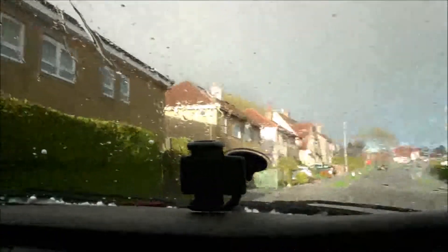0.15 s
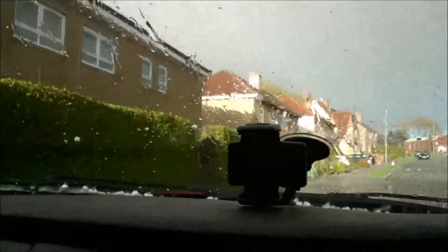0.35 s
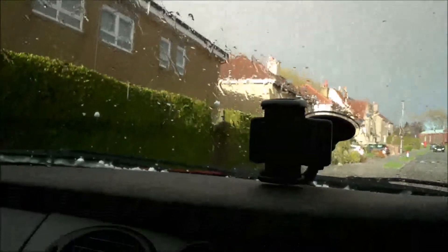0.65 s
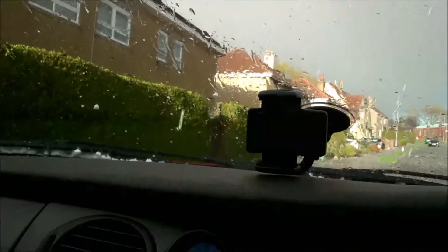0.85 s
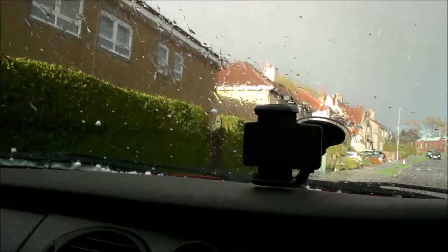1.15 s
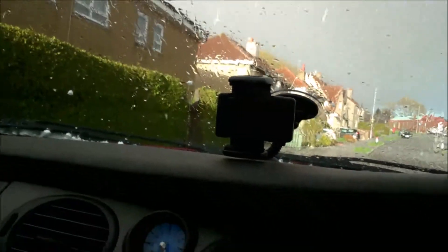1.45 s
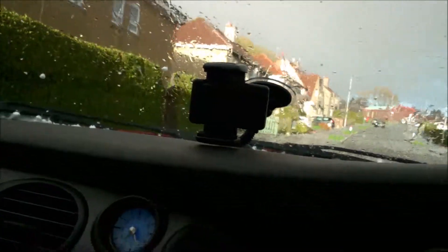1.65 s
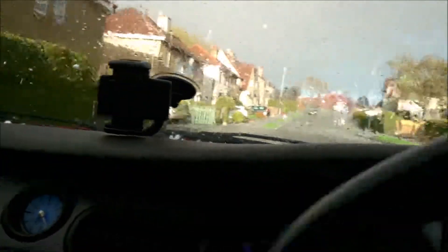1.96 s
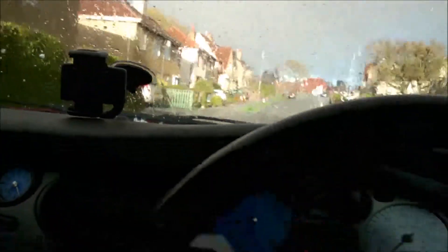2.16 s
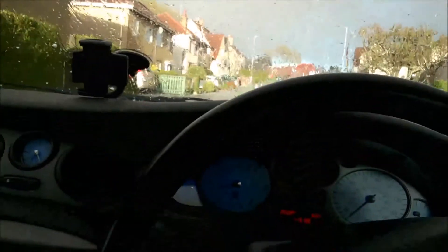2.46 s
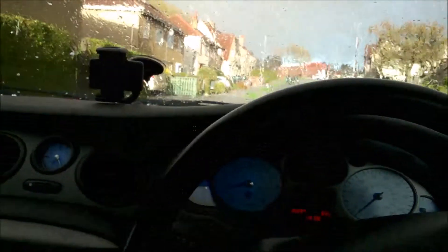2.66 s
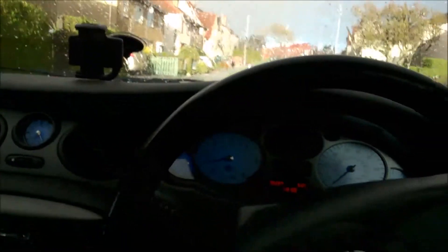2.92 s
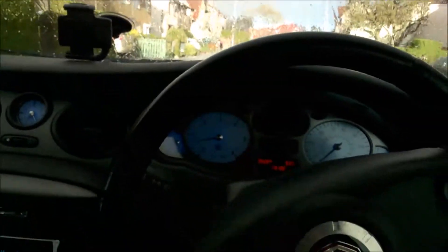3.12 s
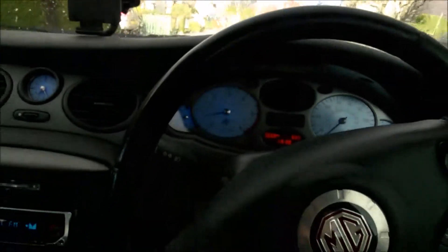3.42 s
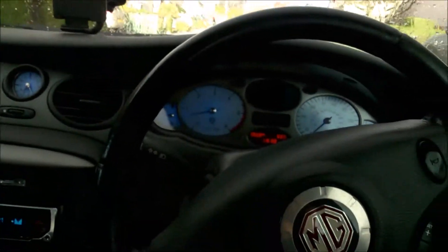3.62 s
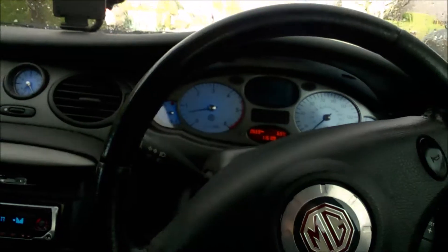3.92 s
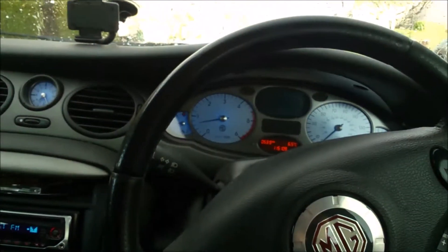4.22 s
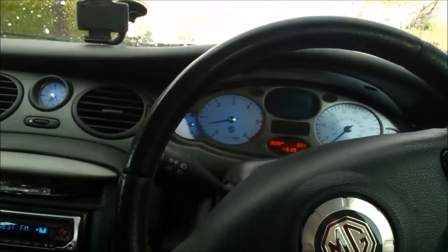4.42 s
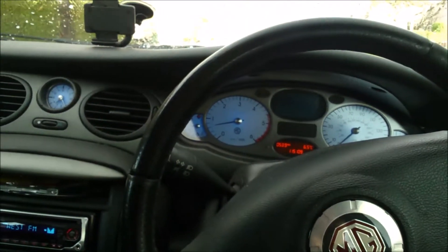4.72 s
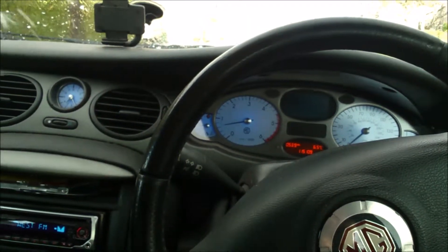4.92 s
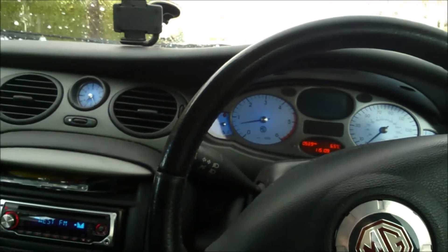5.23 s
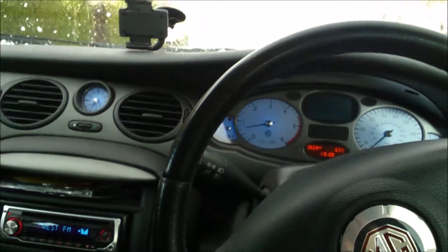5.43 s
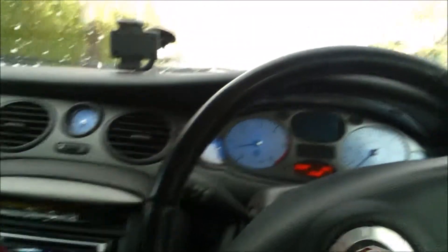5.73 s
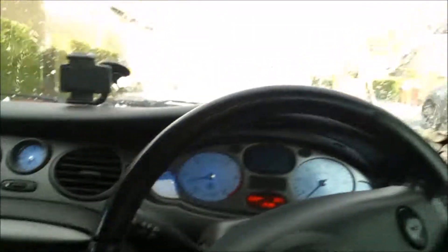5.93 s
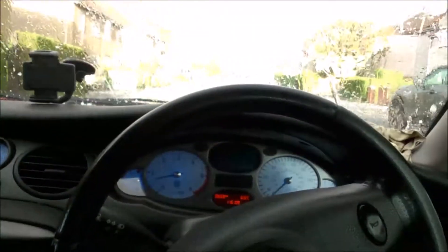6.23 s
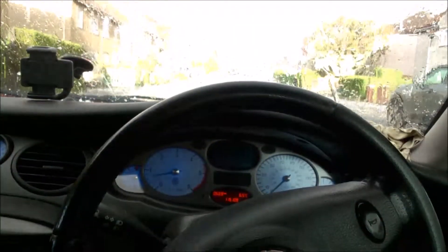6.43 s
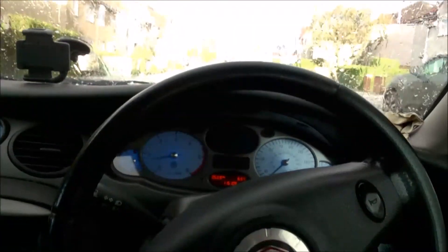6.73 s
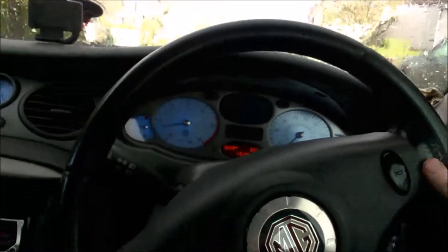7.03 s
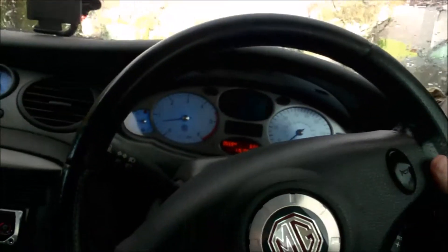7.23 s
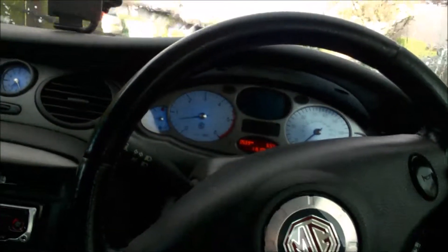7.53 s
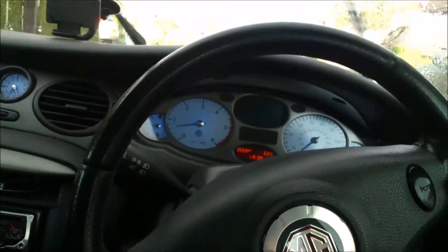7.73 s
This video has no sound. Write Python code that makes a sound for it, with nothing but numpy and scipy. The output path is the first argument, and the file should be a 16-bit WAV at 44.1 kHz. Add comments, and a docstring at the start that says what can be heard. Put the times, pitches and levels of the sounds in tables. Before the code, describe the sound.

Hailstones crack on a windscreen and thud on a car roof, thickening steadily, heard from the driver's seat over a low idling engine hum.

```python
"""Hail on a parked car

Heard from the driver's seat: stones crack on the glass and thud on the roof, and panels and cabin ring briefly.
Close by, decaying sines give clicks, knocks and booms, and bands of fading noise give the ring of the shell.
Farther off, small stones merge into a shaped hiss; the idling engine hums as sines over a low noise rumble.
Two unlike microphones listen: the left one is thin in the bass and dull in the treble.
"""
import sys
import numpy as np
from scipy import signal
from scipy.fft import rfft, irfft, next_fast_len
from scipy.io import wavfile
from scipy.ndimage import map_coordinates

SR = 44100
rng = np.random.default_rng(int(sys.argv[2]) if len(sys.argv) > 2 else 0)


def ratio_of_db(decibels):
    """Turn decibels (scalar or array-like) into linear amplitude factors; 0 dB maps to 1."""
    return 10 ** (np.asarray(decibels, float) / 20)


def master_out(mix):
    """Clip the mix to full scale and print it as 16-bit PCM to the path in sys.argv[1]."""
    frames = np.transpose(np.atleast_2d(mix))
    ceiling = np.clip(frames, -1, 1)
    pcm = np.round(ceiling * 32767).astype(np.int16)
    wavfile.write(sys.argv[1], SR, pcm)


N = 347067  # length in samples


def along(points, hz):
    """Reads (hz, value) points on a log frequency axis."""
    point_hz, value = np.transpose(points)
    return np.interp(np.log(hz + 1), np.log(point_hz + 1), value)


def curves(rows):
    """One value per sample for each column after the time."""
    start_s, *columns = np.transpose(rows)
    return [np.interp(np.arange(N) / SR, start_s, column) for column in columns]


def unit(x):
    """Scaled to rms 1."""
    return x / np.sqrt(np.mean(x ** 2) + 1e-20)


def wobble(rate):
    """A smooth random curve, rate knots a second."""
    knots = rng.standard_normal(int(N * rate / SR) + 4)
    return map_coordinates(knots, [np.arange(N) * rate / SR])


def filtered(x, response):
    """x times a complex response of frequency."""
    size = next_fast_len(N + 8192)
    spectrum = rfft(x, size) * response(np.fft.rfftfreq(size, 1 / SR))
    return irfft(spectrum, size)[..., :N]


# Likeness of diffuse sound at the two microphones: pitch_hz [Hz], likeness [0 to 1]
LIKENESS = [(300, 0.92), (640, 0.81), (1400, 0.12), (3000, 0.0062)]


def diffuse():
    """White noise at both microphones, alike in the bass and unrelated in the treble."""
    def mid_and_side(hz):
        angle = np.arccos(np.clip(along(LIKENESS, hz), 0, 1)) / 2
        return np.array([np.cos(angle), np.sin(angle)])
    mid, side = filtered(rng.standard_normal((2, N)), mid_and_side)
    return np.array([mid + side, mid - side])


# Engine firing, before a common lift: start_s [s], pitch_hz [Hz], level_db [dB]
FIRING = [(0, 51.6, -29), (1.2, 52.24, -29.5), (7.87, 51.73, -30.5)]
# Engine orders at 1/2, 3/2 and 2 times the firing rate: level_db [dB beside the firing tone]
ORDER_LEVELS = [-24, -13.5, -16.5]
# Steady low tone that comes in later, before a small lift: start_s [s], level_db [dB]
DRONE_LEVEL = [(3.5, -58), (4.5, -36), (7.87, -36.5)]
# Colour of the body rumble: pitch_hz [Hz], level_db [dB per Hz, relative]
RUMBLE_COLOUR = [(30, -26), (65, -0.5), (120, 8), (300, -8), (2500, -28)]


def engine():
    """The idling engine: a strong firing tone, weaker orders, a low drone and a noisy body rumble."""
    firing_hz, firing_db = curves(FIRING)
    phase = 2 * np.pi * np.cumsum(firing_hz) / SR
    hum = ratio_of_db(0.4 * wobble(6)) * np.sin(phase)
    for order, order_db in zip((0.5, 1.5, 2), ORDER_LEVELS):
        hum += ratio_of_db(order_db + 2.2 * wobble(5)) * np.sin(order * phase + 6 * rng.random())
    drone_hz = 86.6
    drone_db = curves(DRONE_LEVEL)[0] + 1.9 * wobble(2.8)
    drone = ratio_of_db(drone_db) * np.sin(2 * np.pi * drone_hz * np.arange(N) / SR)
    rumble = unit(filtered(diffuse(), lambda hz: ratio_of_db(along(RUMBLE_COLOUR, hz))))
    rumble_db = -41.0 + 0.43 * wobble(13.0)
    return ratio_of_db(firing_db + 7) * hum + ratio_of_db(0.5) * drone + ratio_of_db(rumble_db) * rumble


# Hiss of far stones: start_s [s], level_db [dB]
PATTER_LEVEL = [(0, -48.5), (2.5, -49.5), (7.87, -47.5)]
# Colour of that hiss: pitch_hz [Hz], level_db [dB per Hz, relative]
PATTER_COLOUR = [(600, -21), (1200, 4), (4500, -3), (8000, 0.5), (12000, -4.5), (16000, -16)]


def patter():
    """Small stones far along the body and on the street merge into a shaped noise hiss."""
    (level_db,) = curves(PATTER_LEVEL)
    hiss = unit(filtered(diffuse(), lambda hz: ratio_of_db(along(PATTER_COLOUR, hz))))
    return ratio_of_db(level_db + 0.75 * wobble(30)) * hiss


# Stones on the lined roof, a dull knock first, levels relative:
# start_s [s], knock_db [dB], shatter_db [dB], pitch_hz of the spot struck [Hz]
ROOF_STONES = [(0.084, -27, -32.5, 465), (0.145, -36.5, -41, 791), (0.301, -32, -39, 950),
               (0.389, -37.5, -44.5, 1070), (0.662, -33, -29, 1180), (0.718, -21.5, -25, 1100),
               (0.927, -28, -27.5, 1100), (1.048, -20, -22, 649), (1.152, -28.5, -39, 1100),
               (1.236, -36.5, -44, 829), (1.442, -28.5, -37.5, 634), (1.721, -22.5, -34, 1060),
               (1.855, -30, -29.5, 1180), (2.048, -38, -59, 619), (2.105, -23, -33, 517),
               (2.196, -18.5, -27.5, 455), (2.296, -33, -33, 576), (2.521, -25.5, -23, 579),
               (2.664, -31, -35, 504), (2.934, -22.5, -17.5, 463), (2.976, -21, -11.5, 1220),
               (2.987, -19.5, -37, 579), (3.033, -21.5, -22, 444), (3.072, -30.5, -33, 422),
               (3.169, -22.5, -26.5, 735), (3.224, -33, -36, 554), (3.481, -20, -22.5, 510),
               (3.548, -21, -23.5, 1040), (3.634, -18.5, -23, 512), (3.806, -18.5, -14.5, 1245),
               (3.979, -32.5, -36, 648), (4.065, -30.5, -34, 455), (4.259, -26, -19.5, 1260),
               (4.315, -24, -27, 525), (4.337, -24, -22, 1040), (4.383, -27, -54, 961),
               (4.469, -17.5, -23.5, 765), (4.615, -25.5, -31, 640), (4.665, -23, -18, 1013),
               (4.678, -17.5, -7.5, 990), (4.87, -26.5, -25.5, 649), (5.248, -40, -35, 600),
               (5.306, -17.5, -25, 474), (5.479, -22.5, -19.5, 533), (5.542, -31, -30.5, 484),
               (5.653, -29, -27, 1043), (5.814, -22.5, -21, 740), (5.879, -26.5, -27, 514),
               (6.088, -28.5, -31, 650), (6.107, -25.5, -27.5, 724), (6.331, -25.5, -31, 603),
               (6.447, -23, -27.5, 536), (6.514, -23.5, -19.5, 533), (6.899, -23.5, -29, 443),
               (6.931, -20.5, -9.5, 439), (7, -38, -23, 650), (7.056, -31, -38, 495),
               (7.192, -24.5, -24.5, 654), (7.389, -20.5, -13, 620), (7.421, -26.5, -24, 605),
               (7.578, -22.5, -21, 490), (7.594, -21, -14.5, 1020), (7.651, -24, -18.5, 427),
               (7.711, -23, -22.5, 474)]
# Stones on the glass, a hard tick first, levels relative: start_s [s], tick_db [dB], shatter_db [dB]
GLASS_STONES = [(0.275, -36, -39), (0.451, -29.5, -32), (1.005, -32.5, -39), (1.109, -18, -33.5),
                (1.183, -27, -39.5), (1.256, -33, -35), (1.307, -32, -41.5), (1.523, -41.5, -48),
                (1.569, -16.5, -17.5), (1.938, -26, -42), (2.272, -39, -45), (2.643, -42, -46),
                (2.864, -26, -32.5), (3.15, -35, -36), (3.295, -40, -40), (3.464, -23, -25.5),
                (3.693, -25, -35.5), (3.791, -34, -18.5), (3.87, -31, -21), (3.884, -23.5, -30),
                (3.93, -37.5, -39), (3.965, -31.5, -50), (4.017, -18.5, -15.5), (4.108, -24, -33.5),
                (4.163, -27.5, -32), (4.192, -34.5, -46), (4.226, -19.5, -26.5), (4.456, -31.5, -40),
                (4.56, -31, -33), (4.583, -26.5, -30), (4.631, -21.5, -23), (4.744, -31.5, -30.5),
                (4.799, -32.5, -47), (4.822, -25.5, -21), (4.896, -34, -26), (4.94, -30.5, -26),
                (5.011, -27, -33), (5.049, -22.5, -30.5), (5.105, -35, -48), (5.161, -40, -36),
                (5.19, -31, -31.5), (5.264, -26.5, -74), (5.376, -27.5, -37), (5.408, -28.5, -46),
                (5.449, -29.5, -22), (5.514, -25.5, -27), (5.628, -35.5, -30.5), (5.67, -20, -20),
                (5.722, -29.5, -22), (5.77, -36, -36), (5.863, -33.5, -33), (5.899, -18.5, -17),
                (5.942, -23, -22.5), (6.045, -26, -32.5), (6.076, -29, -29.5), (6.147, -44, -26.5),
                (6.222, -24.5, -46), (6.238, -24.5, -27.5), (6.348, -22.5, -26.5), (6.365, -19.5, -15),
                (6.392, -23, -28), (6.484, -20, -20), (6.533, -24.5, -25), (6.599, -25, -28),
                (6.641, -32, -51), (6.664, -23, -26.5), (6.699, -29, -45), (6.739, -29, -24.5),
                (6.763, -22.5, -28), (6.847, -24.5, -11.5), (6.871, -35, -21.5), (7.004, -20.5, -19),
                (7.145, -36, -39), (7.214, -22.5, -15), (7.327, -25.5, -40), (7.346, -29, -24),
                (7.48, -31, -26.5), (7.504, -26, -27.5), (7.535, -27.5, -51), (7.643, -27, -22.5),
                (7.809, -27.5, -16.5)]


def big_stones():
    """Rows (start_s, knock_db, tick_db, shatter_db): where a stone lands sets knock against tick."""
    roof_tick_db, glass_knock_db = -1.5, -11.5  # beside the roof knock; beside the glass tick
    roof = [(s, knock_db, knock_db + roof_tick_db, shatter_db) for s, knock_db, shatter_db, _ in ROOF_STONES]
    glass = [(s, tick_db + glass_knock_db, tick_db, shatter_db) for s, tick_db, shatter_db in GLASS_STONES]
    return np.array(roof + glass)


def shower(typical_db, uneven_db, grows_db):
    """All near stones: the big ones, and 120 small ones that fall at random."""
    draws = rng.standard_normal((120, 4))
    late = np.sqrt(rng.random((len(draws), 1)))  # the shower thickens steadily and its stones grow
    spread_db = uneven_db * (draws[:, :1] + draws[:, 1:])  # one draw for the stone, one for each level
    small_db = typical_db + spread_db + grows_db * (late - 1)
    return np.vstack([big_stones(), np.hstack([late * N / SR, small_db])])


def glassy(stones):
    """Near 0 for a dull knock on the lined roof or a slushy splash, near 1 for a hard tick on the glass."""
    _, knock_db, tick_db, shatter_db = np.transpose(stones)
    dull_db = np.maximum(knock_db + 4, shatter_db)
    return 1 / (1 + np.exp((dull_db - tick_db) / 1.25))


def struck(blows, modes_hz, t60, db, uneven_db, detune, off_pitch_db, apart_ms):
    """Each (start_s, level_db, pitch_hz) blow rings clear modes, weaker by off_pitch_db an octave away
    from its pitch; every mode reaches the two microphones a little apart."""
    out = np.zeros((2, N + SR))
    t = np.arange(SR // 4) / SR
    hz = np.array(modes_hz)[:, None]
    fade = ratio_of_db(-60 * t / t60) * (1 - np.exp(-t * hz))  # each mode builds over about a cycle
    draws = rng.standard_normal((len(blows), 3, len(hz), 1))
    for (start_s, blow_db, pitch_hz), (uneven, shift, delay) in zip(blows, draws):
        octaves_off = np.abs(np.log2(hz / pitch_hz))
        mode_db = blow_db + db + uneven_db * uneven - off_pitch_db * octaves_off
        heard_s = t + np.multiply.outer([-0.5, 0.5], apart_ms / 1000 * delay)
        modes = ratio_of_db(mode_db) * fade * np.sin(2 * np.pi * hz * (1 + detune * shift) * heard_s)
        out[:, round(start_s * SR):][:, :len(t)] += modes.sum(axis=1)
    return out[:, :N]


# Lowest modes of the roof: pitch_hz [Hz]
ROOF_MODES = [134, 154, 181.1, 265.5, 296.4]
# Heavy blows in the middle of the roof, levels relative: start_s [s], level_db [dB]
HEAVY_BLOWS = [(0.094, -25), (0.72, -23), (1.106, -21.5), (1.44, -39), (1.935, -39), (3.489, -14),
               (4.226, -27), (4.314, -22.5), (4.466, -20), (4.677, -16), (5.815, -23), (6.929, -16),
               (7.206, -23), (7.577, -18.5)]


def roof_booms():
    """Heavy blows set the lowest modes of the roof ringing, strongest near the pitch of its middle."""
    middle_hz = 154
    blows = [(*blow, middle_hz) for blow in HEAVY_BLOWS]
    return struck(blows, ROOF_MODES, t60=0.38, db=-7, uneven_db=4, detune=0.0138, off_pitch_db=3, apart_ms=0.17)


# Clear modes of roof and screen: pitch_hz [Hz]
PANEL_MODES = [459, 520.3, 643, 916, 1074, 1226, 1388, 1678]


def panel_knocks():
    """Roof stones ring the panel modes, strongest near the pitch of the spot struck."""
    blows = np.delete(ROOF_STONES, 2, axis=1)  # without the shatter level
    return struck(blows, PANEL_MODES, t60=0.09, db=4.5, uneven_db=2.0, detune=0.015, off_pitch_db=28,
                  apart_ms=0.17)


# Bands of the struck shell: pitch_hz [Hz], level_db [dB, relative],
# place [0 follows the knock, 1 the tick, 2 the shatter], t60_s of the early decay [s]
SHELL_BANDS = [(180, -17.5, 0.59, 0.39), (340, -15, 0.4, 0.35), (574, -6.5, 0, 0.15),
               (956, -4.5, 0.093, 0.14), (1790, -4.5, 0.53, .1), (2410, -2.5, 0.87, 0.083),
               (3960, -3, 1.27, 0.076), (5760, -3, 1.37, 0.071), (8050, 3.5, 2, 0.054),
               (11770, -6.5, 2, 0.049), (13200, -8, 2, 0.055)]


def ringing(stones, colour_db, roof_ms, glass_ms, late_db, late_times):
    """Each stone sets the dense modes of the shell going; every noise band dies at its own speed."""
    hz, level_db, place, t60_s = np.transpose(SHELL_BANDS)[:, :, None]
    step_s = 8 / SR
    t = np.arange(0, 0.3, step_s)
    power = np.zeros((len(SHELL_BANDS), round(N / SR / step_s) + len(t) + 2))
    spots = rng.standard_normal((len(stones), len(SHELL_BANDS), 1))  # every spot struck has its own colour
    early = ratio_of_db(-120 * t / t60_s)  # decays are of power, so their dB count double
    late = ratio_of_db(2 * late_db - 120 * t / (t60_s * late_times))
    for (start_s, *levels_db), glass, spot in zip(stones, glassy(stones), spots):
        start = round(start_s / step_s)
        rise_ms = roof_ms + glass * (glass_ms - roof_ms)  # the roof fills the cabin slowly, glass snaps at once
        build = 1 - np.exp(-1000 * t / rise_ms)
        gain = ratio_of_db(np.interp(place, range(3), levels_db) + level_db + colour_db * spot)
        power[:, start:start + len(t)] += gain ** 2 * build * (early + late)
    noise = diffuse()
    edges = [4.6, *np.log(hz[:, 0]), 9.8]  # log Hz
    steps = np.arange(N) / SR / step_s
    ring = np.zeros((2, N))
    for k in range(len(SHELL_BANDS)):
        peak = np.arange(len(edges)) == k + 1  # a triangle between the neighbouring bands
        band = filtered(noise, lambda f: np.interp(np.log(f + 1), edges, peak))
        loudness = np.interp(steps, range(power.shape[1]), np.sqrt(power[k]))
        ring += loudness * unit(band)
    return ring


def clicks(stones, db, centre_hz, life_ms):
    """Hard ice on glass: a few cycles of two random tones that reach the microphones directly."""
    out = np.zeros(N + SR)
    t = np.arange(SR // 100) / SR
    envelope = t / t[20] * np.exp(-1000 * t / life_ms)
    draws = rng.standard_normal((len(stones), 2, 1))
    for (start_s, _, tick_db, _), glass, draw in zip(stones, glassy(stones), draws):
        cycles = np.sin(2 * np.pi * centre_hz * np.exp(0.29 * draw) * t).sum(axis=0)
        out[round(start_s * SR):][:len(t)] += glass * ratio_of_db(tick_db + db) * cycles * envelope
    return out[:N]


def hail():
    """The near stones: clicks, knocks, booms and a ring that crackles with splinters of ice."""
    stones = shower(typical_db=[-44, -44, -44], uneven_db=3.5, grows_db=9.5)
    ring = ringing(stones, colour_db=2.5, roof_ms=7.13, glass_ms=0.4, late_db=-18.5, late_times=2.2)
    splinters = unit(ratio_of_db(1.2 * wobble(1500)))
    ticks = clicks(stones, db=15, centre_hz=3790, life_ms=0.49)
    return ratio_of_db(6) * splinters * ring + panel_knocks() + roof_booms() + ticks


def scene():
    """The engine, the far patter and the near hail."""
    return engine() + patter() + hail()


# Treble shading of the left microphone: pitch_hz [Hz], level_db [dB]
LEFT_SHADING = [(3000, -0.67), (5000, -2), (8000, -11), (15000, -17)]


def left_microphone(x):
    """Loses bass like a simple high-pass and is shaded in the treble."""
    bass_hz = 99
    return filtered(x, lambda hz: ratio_of_db(along(LEFT_SHADING, hz)) * 1j * hz / (bass_hz + 1j * hz))


def top_cut(x):
    """Nothing passes above the cut-off."""
    return signal.sosfilt(signal.butter(12, 16520, fs=SR, output="sos"), x)


def record(dry):
    """The left microphone colours its side, the right one is left plain; peaks clip softly."""
    mix = np.array([left_microphone(dry[0]), dry[1]])
    mix = mix / (1 + np.abs(mix / 0.99) ** 6) ** (1 / 6)
    return top_cut(mix)


dry = scene()
out = record(dry)
master_out(out)
```